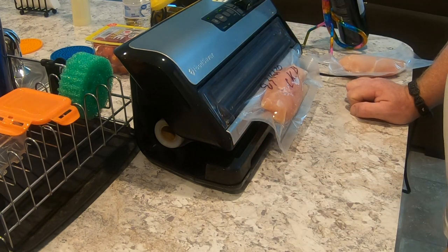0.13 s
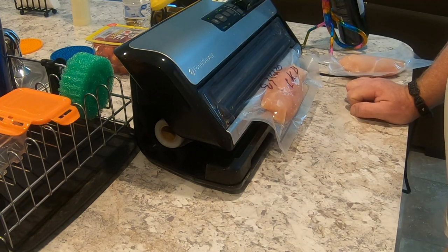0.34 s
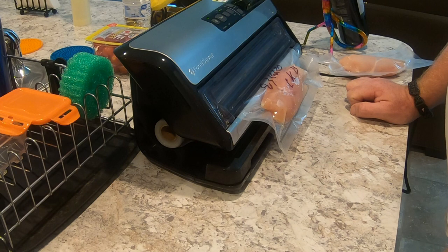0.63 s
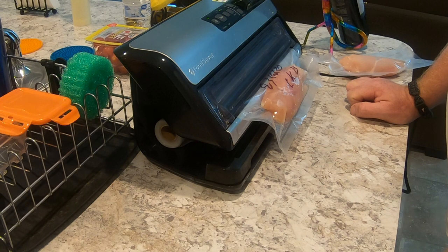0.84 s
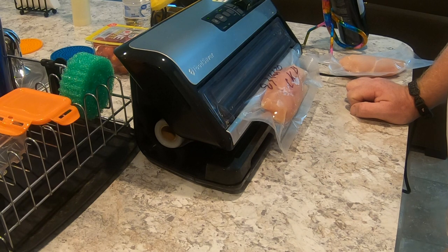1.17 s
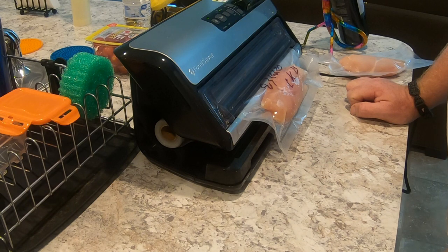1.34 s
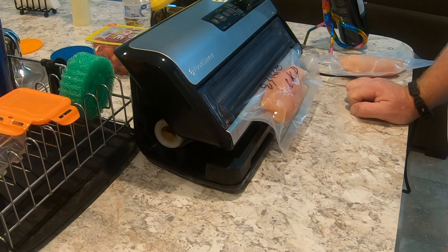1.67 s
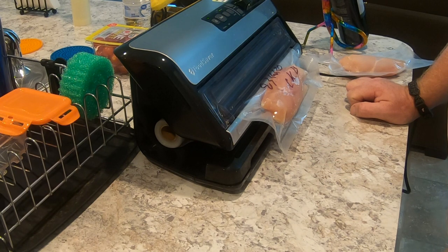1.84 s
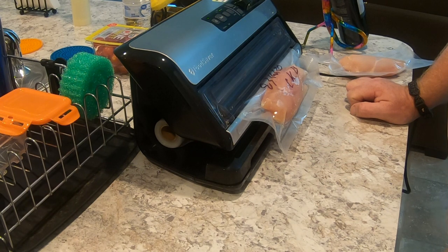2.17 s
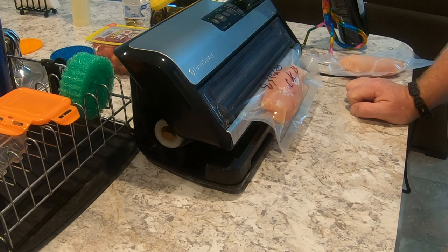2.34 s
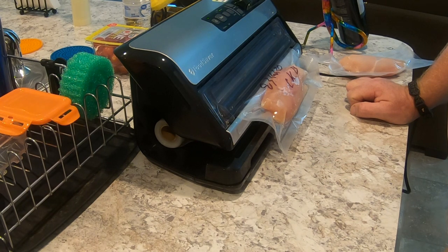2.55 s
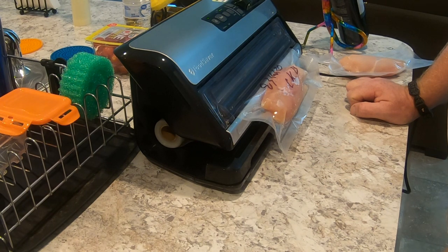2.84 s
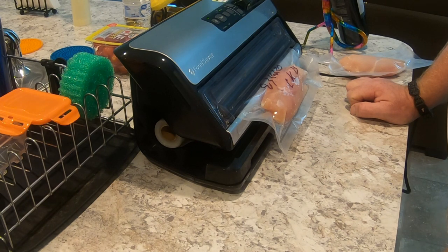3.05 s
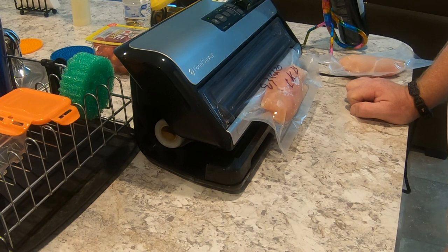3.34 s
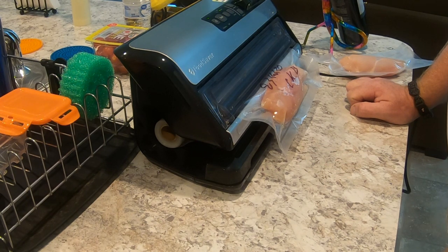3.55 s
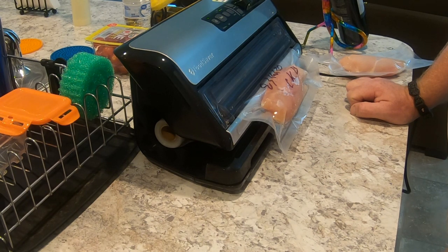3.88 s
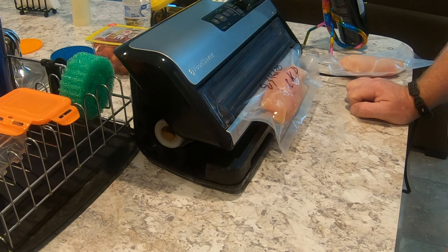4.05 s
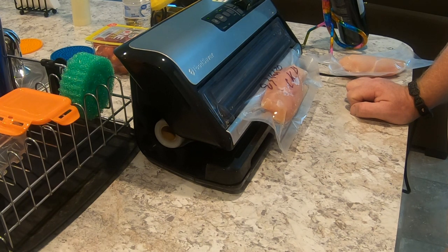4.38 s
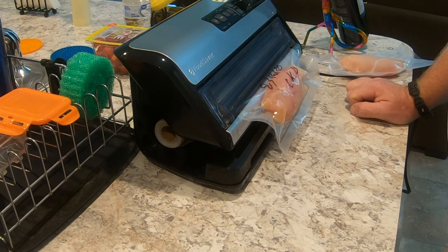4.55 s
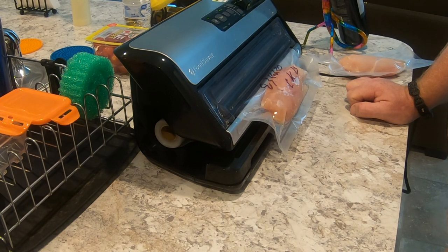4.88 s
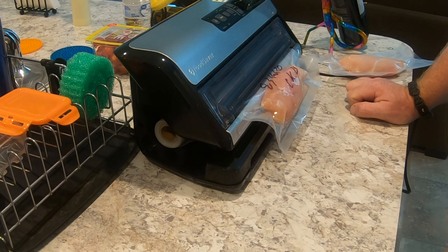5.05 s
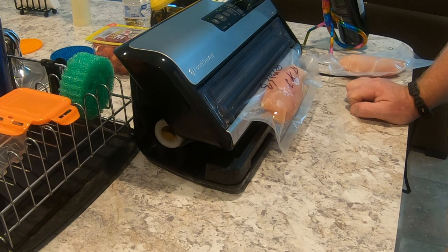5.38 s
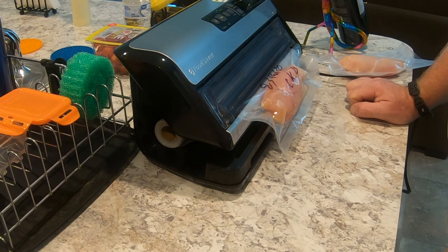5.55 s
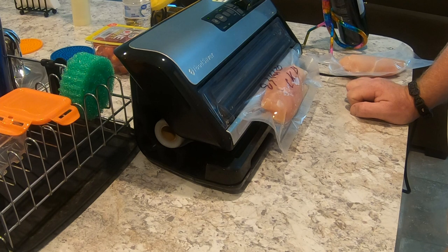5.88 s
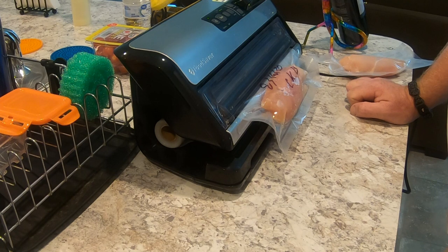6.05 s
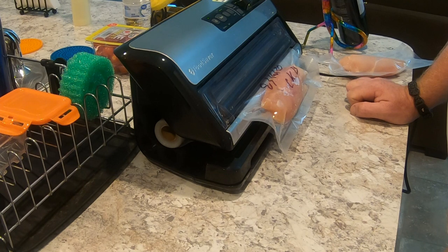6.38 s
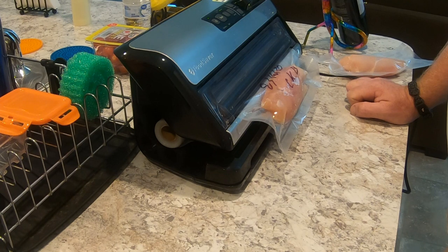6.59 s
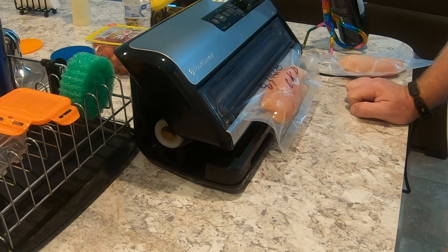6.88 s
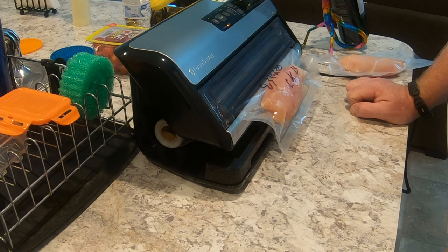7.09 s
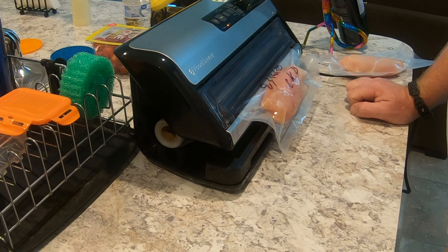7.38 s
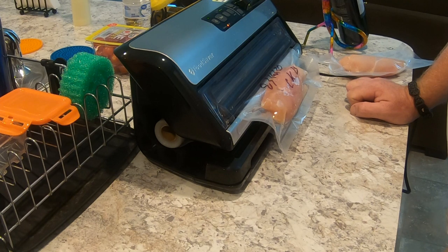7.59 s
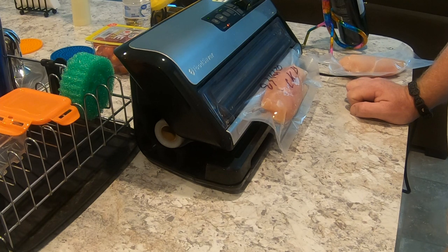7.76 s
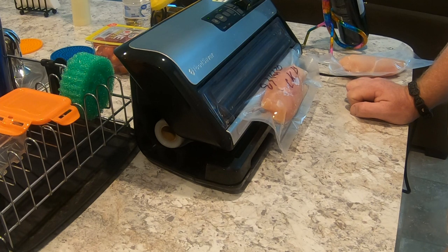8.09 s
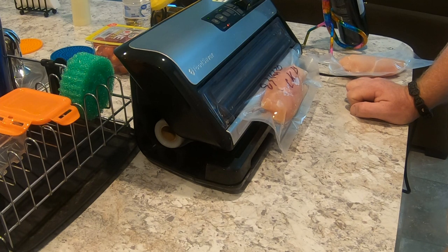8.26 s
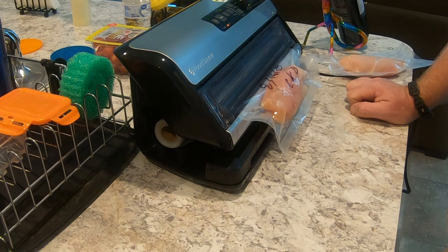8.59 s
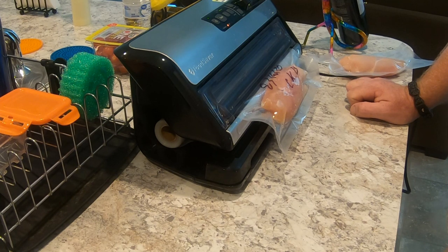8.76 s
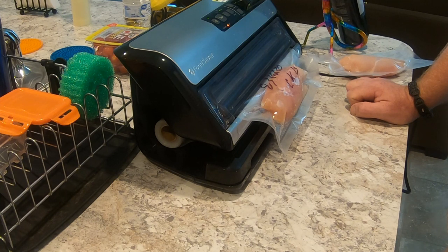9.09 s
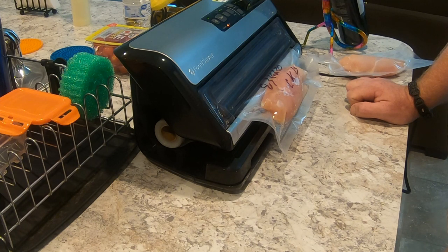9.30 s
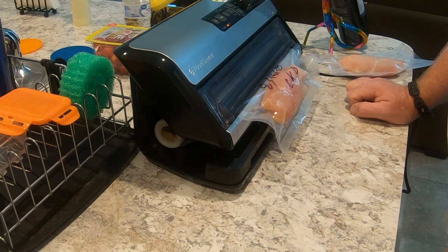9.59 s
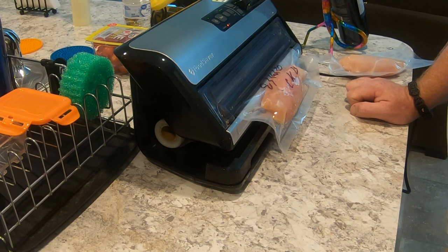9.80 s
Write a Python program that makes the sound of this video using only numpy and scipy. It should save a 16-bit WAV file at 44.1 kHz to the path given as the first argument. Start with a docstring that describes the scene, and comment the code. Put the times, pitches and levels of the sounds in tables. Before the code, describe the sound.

From 0 s a small vacuum pump is already running close to the microphone, slightly right, on a stone counter in a reflective kitchen. Its strong low hum sits near 100 Hz, rising barely a hertz or so over the first seconds, with buzzing overtones that beat quickly, loose panel rattle, and grainy contact noise and hissing valve air pulsing at stroke rate. At about 3.7-3.9 s the housing seats: the panel buzz disappears and the tone becomes cleaner and steadier, with slightly more air. At 7.2 s power cuts. Overtones vanish almost at once, the pitch sags, and two or three soft low shudders fade by about 7.45 s while the room and a counter resonance ring out. Until about 10 s only a quiet low appliance drone, hums, faint thin whines and tiny high ticks, about six a second, remain, creeping up slightly in level.

```python
"""A small motor-driven vacuum pump in a plastic housing buzzes loosely on a stone kitchen counter.
It speeds up a little as the bag empties, its overtones beating with the supply ripple over rattle and valve air.
Near 3.8 s the housing seats and the buzz gets cleaner; at 7.2 s power goes off, and the pump coasts and shudders.
The room rings out, and the gain creeps up in the quiet.
An appliance drone, hums, thin whines and a faint fast ticking run underneath from start to end."""
import sys
import numpy as np
from scipy import signal
from scipy.fft import rfft, irfft, next_fast_len
from scipy.io import wavfile
from scipy.ndimage import uniform_filter1d

SR = 44100
rng = np.random.default_rng(int(sys.argv[2]) if len(sys.argv) > 2 else 0)


def voltage_ratio(decibels):
    """Convert decibels (scalar or array-like) to amplitude ratios, 20 dB per decade."""
    exponent = np.asarray(decibels, float) / 20
    return 10 ** exponent


def transcribe(u):
    """Save the signal u as a 16-bit wav file named by the first command-line argument.

    u: samples, shape (n,) or (channels, n), limited to [-1, 1]; the rate is SR.
    q: integer samples, one column per channel.
    """
    v = np.clip(np.atleast_2d(u).T, -1, 1)
    q = np.round(v * 32767).astype(np.int16)
    wavfile.write(sys.argv[1], SR, q)


N = 437899
TIME_S = np.arange(N) / SR
OFF_S = 7.215   # power off
KNOCK_FALL_S = .017   # time after power off at which overtones and ripple are 6 dB down


def at_hz(points, hz):
    """A spectrum read on a log-frequency axis."""
    f, value = np.transpose(points)
    return np.interp(np.log(hz + 1), np.log(f), value)


def peaks(table, hz):
    """Sum of bell-shaped boosts in dB."""
    return sum(db / (1 + (2 * (hz - f) / width) ** 2) for f, width, db in table)


def drift(rate_hz):
    """Slow random wander with spread 1: noise through two equal one-pole low-passes, run at SR / 40."""
    r = np.exp(-80 * np.pi * rate_hz / SR)
    noise = rng.standard_normal(N // 40 + 4002)
    slow = signal.lfilter([1], [1, -2 * r, r * r], noise)[4000:]   # skip the filter's start
    return np.interp(np.arange(N) / 40, np.arange(len(slow)), slow / slow.std())


def resonance(x, hz, width):
    """Two-pole band-pass with gain 1 on top."""
    r = np.exp(-np.pi * width / SR)
    feedback = [1, -2 * r * np.cos(2 * np.pi * hz / SR), r * r]
    return signal.lfilter([(1 - r * r) / 2, 0, (r * r - 1) / 2], feedback, x)


def coloured(pair, db_at, likeness):
    """Two unrelated noises become mid and side of a stereo pair with the given dB per Hz."""
    size = next_fast_len(pair.shape[1])
    hz = np.arange(size // 2 + 1) * SR / size
    mid, side = rfft(pair, size) * voltage_ratio(db_at(hz)) * np.sqrt(SR / 4)
    alike = np.clip(at_hz(likeness, hz), 0, 1)
    both = np.sqrt(1 + alike) * mid + np.sqrt(1 - alike) * side * [[1], [-1]]
    return irfft(both, size)[:, :pair.shape[1]]


def tone(phase, db, pan_db, spread):
    """One partial; the two ears hear it with slightly different level and phase (spread in rad)."""
    skew = spread * rng.choice([-1, 1])
    left = voltage_ratio(pan_db / 2) * np.cos(phase + skew)
    right = voltage_ratio(-pan_db / 2) * np.cos(phase - skew)
    return voltage_ratio(db) * np.sqrt(2) * np.array([left, right])


# the housing stops buzzing loosely and seats: t/s, seated share (0-1)
SEATED_SHARE = [(0, 0.13), (.9, 0), (3.7, 0), (3.9, 0.88), (10, 0.98)]


def seating():
    """How firmly the housing sits, from loose (0) to seated (1)."""
    t, share = np.transpose(SEATED_SHARE)
    return np.interp(TIME_S, t, share)


START_HZ, CLIMB_HZ, CLIMB_S = 99.9, 1.33, 1.0   # the speed climbs toward a settled rate as the bag empties
SEATED_GAIN_HZ, WANDER_HZ = .5, .06
COAST_LOSS_HZ, COAST_S = 34, .14   # speed lost after power off, and its time constant
STROKE_DB, COAST_SWELL_DB = -17, 1   # the stroke swells as the rotor coasts through the resonance of the feet
LAST_STROKE_S, LAST_STROKE_FADE_S = 7.263, 0.004   # the last full stroke
RATTLE_HOLD_S, RATTLE_FALL_DB_PER_S = 0.031, 203   # rattle and air after power off
SHUDDER_S = 0.025   # from the centre of a shudder to 1/e
# the housing shudders on its feet as the rotor stalls: t/s, level/dB
FOOT_SHUDDERS = [(7.305, -28.5), (7.372, -34), (7.44, -54)]


def motor(seated):
    """Speed, and the levels of stroke tone, overtones and rattle, through running and power off."""
    off = np.maximum(TIME_S - OFF_S, 0)
    speed = START_HZ + CLIMB_HZ * (1 - np.exp(-TIME_S / CLIMB_S))
    speed = speed + SEATED_GAIN_HZ * seated + WANDER_HZ * drift(1.6)
    speed = speed - COAST_LOSS_HZ * (1 - np.exp(-off / COAST_S))
    stroking = .5 - .5 * np.tanh((TIME_S - LAST_STROKE_S) / (2 * LAST_STROKE_FADE_S))
    swell_db = COAST_SWELL_DB * np.clip(off / KNOCK_FALL_S, 0, 1)
    shudder = sum(voltage_ratio(db) * np.exp(-((TIME_S - t) / SHUDDER_S) ** 2) for t, db in FOOT_SHUDDERS)
    stroke_db = 20 * np.log10(voltage_ratio(STROKE_DB + swell_db) * stroking + shudder + 1e-9)
    overtone_fade_db = -20 * np.log10(2) * (off / KNOCK_FALL_S) ** 2   # the loss grows as time squared
    rattle_fade_db = -RATTLE_FALL_DB_PER_S * np.maximum(off - RATTLE_HOLD_S, 0)
    return speed, stroke_db, overtone_fade_db, rattle_fade_db


# overtones of the stroke: multiple, loose level/dB, seated level/dB, left minus right level/dB
STROKE_OVERTONES = [(2, -40, -43, 0), (3, -29.5, -29, -0.5), (4, -32, -31, -1), (5, -53, -38, -1),
                    (6, -39, -39, -4), (7, -40, -33, -2), (8, -42, -35, -1), (9, -33, -35, -2),
                    (10, -45, -41, -2), (11, -37, -36, -2), (12, -40, -38, 1), (13, -40, -39, -2),
                    (14, -49, -42, -3), (15, -45, -40, -3), (16, -47, -42, -3), (17, -49, -47, -3),
                    (18, -43, -52, -2)]
# narrow counter-top resonances that the loose overtones slide past: f/Hz, width/Hz, boost level/dB
COUNTER_MODES = [(299.5, 3, -2), (400.5, 4, 6.5), (404.5, 3, -1.5)]
# supply ripple beating with the stroke: multiple, upper tone loose level/dB, upper seated level/dB,
# lower tone loose level/dB, lower seated level/dB
RIPPLE_PAIRS = [(3, -44.5, -45.5, -56.5, -59), (4, -51.5, -52, -56.5, -57), (5, -41, -56.5, -54.5, -48),
                (6, -37.5, -40, -45.5, -47.5), (7, -33.5, -40.5, -49, -57), (8, -34.5, -44, -45.5, -50),
                (9, -52.5, -62.5, -47, -55.5), (10, -61, -47.5, -45, -51), (11, -49, -45, -52, -54),
                (12, -42.5, -46, -43, -41), (13, -43.5, -44, -53, -46), (14, -46, -48, -48, -38.5),
                (15, -48.5, -59, -57, -49), (16, -50, -56, -46.5, -56.5)]
RIPPLE_HZ = 120


def stroke_tones(turn, speed, stroke_db, fade_db, seated):
    """The stroke, its overtones, and tones on either side of them that beat at supply ripple minus stroke rate."""
    out = tone(turn, stroke_db + 0.15 * drift(4.7), -1.0, 0)
    beat = 2 * np.pi * RIPPLE_HZ * TIME_S - turn
    waver = [drift(4.6) for _ in range(4)]   # strokes are never quite alike
    for k, loose_db, seated_db, pan_db in STROKE_OVERTONES:
        high = min(1, (k / 6) ** 2)   # upper partials are less steady and more spread out
        db = loose_db + (seated_db - loose_db) * seated + fade_db + 0.65 * seated * high
        db = db + (1 - seated) * peaks(COUNTER_MODES, k * speed) + 0.3 * high * waver[int(k) % 4]
        # overtones gather loosely into one knock a stroke
        knock = k * (turn + .8) + rng.normal(0, 1.2)
        knock = knock + 0.17 * high * (1 - 0.74 * seated) * waver[int(k + 1) % 4]
        out += tone(knock, db, pan_db, spread=0.28 * high ** 2)
    for k, up_loose, up_seated, down_loose, down_seated in RIPPLE_PAIRS:
        for sign, loose_db, seated_db in (1, up_loose, up_seated), (-1, down_loose, down_seated):
            db = loose_db + (seated_db - loose_db) * seated + fade_db + 1.15 * waver[int(k + sign) % 4]
            phase = k * turn + rng.uniform(0, 2 * np.pi) + sign * beat + 0.23 * waver[int(k + 2) % 4]
            out += tone(phase, db, -1.46, spread=0.14 * min(1, (k / 6) ** 2))
    return out


RING_HZ, RING_WIDTH_HZ, RING_DB = 406.8, 2.4, -6   # level against the tones that drive it


def counter_ring(tones):
    """A narrow counter-top mode, driven by the tones, that rings on after the overtones stop."""
    return voltage_ratio(RING_DB) * resonance(tones, RING_HZ, RING_WIDTH_HZ)


# air and rattle noise of the pump: f/Hz, level/dB per Hz
CLATTER_SPECTRUM = [(30, -74.5), (60, -78), (90, -60.5), (170, -68.5), (300, -65.5), (400, -68),
                    (700, -59.5), (1000, -66), (1350, -65), (1700, -63.5), (3200, -66.5), (4200, -66.5),
                    (4450, -70.5), (6000, -74.5), (9500, -80.5), (10800, -86), (11400, -103), (12000, -99),
                    (14200, -101), (15000, -125)]
# housing resonances in that noise: f/Hz, width/Hz, boost level/dB
HOUSING_MODES = [(1855, 130, 0.5), (2245, 200, 1), (2680, 490, 6), (3526, 250, 3.5), (3890, 750, 3.5),
                 (5120, 630, 4), (8140, 650, 6), (13070, 660, 8.5)]
# loose panel, heard until the housing seats: f/Hz, width/Hz, relative level/dB
PANEL_MODES = [(649, 250, -49), (770, 41, -49), (803, 51, -57), (1275, 71, -46.5)]
# stereo width of the pump noise: f/Hz, left-right likeness (0-1)
PUMP_LIKENESS = [(25, 0.75), (60, 0.95), (150, .98), (330, .98), (630, 0.29), (1380, 0.77), (3030, 0.94),
                 (5500, 0.5), (8500, 0), (14500, 0.1)]
AIR_HZ = 4770   # valve air takes over from the rattle above this
SEATED_AIR_DB = 1.34   # valve air gains a little once the housing seats


def clatter(turn, fade_db, seated):
    """Rattling contacts swell once a stroke, each stroke with its own force; valve air hisses more evenly above."""
    strokes = (turn / (2 * np.pi)).astype(int)
    force_db = uniform_filter1d(rng.normal(0, 1.7, strokes[-1] + 1)[strokes], size=120)
    # sample by sample, random levels make the contacts grainy
    grains = voltage_ratio(2.35 * np.minimum(rng.exponential(1, (2, N)), 4)) * rng.standard_normal((2, N))
    rattle = grains / grains.std() * voltage_ratio(1.6 * np.cos(turn + .8) + force_db + fade_db)
    air_db = .5 * np.cos(turn) + 0.92 * drift(12) + 1.47 * drift(60) + SEATED_AIR_DB * seated + fade_db
    air = rng.standard_normal((2, N)) * voltage_ratio(air_db)

    def body_db(hz):
        return at_hz(CLATTER_SPECTRUM, hz) + peaks(HOUSING_MODES, hz)

    def rattle_spectrum_db(hz):
        return body_db(hz) - 10 * np.log10(1 + (hz / AIR_HZ) ** 4)

    def air_spectrum_db(hz):
        return body_db(hz) - 10 * np.log10(1 + (AIR_HZ / (hz + 1)) ** 4)

    out = coloured(rattle, rattle_spectrum_db, PUMP_LIKENESS)
    out += coloured(air, air_spectrum_db, PUMP_LIKENESS)
    for hz, width, db in PANEL_MODES:
        buzz = resonance(rattle, hz, width) * np.sqrt(SR / np.pi / width)
        panel = np.array([buzz[0] + 0.2 * buzz[1], buzz[0] - 0.51 * buzz[1]])
        out += voltage_ratio(db) * (1 - seated) * panel
    return out


# stereo lean of the pump noise and its echoes: f/Hz, left minus right level/dB
NOISE_BALANCE = [(60, -0.5), (200, -0.8), (370, -0.6), (690, 0.5), (1270, -3.5), (2330, 0), (4290, -0.5),
                 (7890, -3), (14500, 0)]


def balance(noise):
    """Leans each frequency of the noise to one side by level alone."""
    size = next_fast_len(N)
    hz = np.arange(size // 2 + 1) * SR / size
    lean = voltage_ratio(at_hz(NOISE_BALANCE, hz) * [[.5], [-.5]])
    return irfft(rfft(noise, size) * lean, size)[:, :N]


JUDDER_HZ, JUDDER_WIDTH_HZ, JUDDER_DB, JUDDER_FALL_DB_PER_S = 250, 220, -32.5, 50
STALL_S, STALL_FADE_S = 7.385, .008


def judder():
    """Rough low rattle of the housing on its feet: band-passed noise from power off, fading until the stall."""
    rough = rng.standard_normal(N)
    for _ in range(2):
        rough = resonance(rough, JUDDER_HZ, JUDDER_WIDTH_HZ)
    begin = np.clip((TIME_S - OFF_S) / KNOCK_FALL_S, 0, 1)
    end = .5 - .5 * np.tanh((TIME_S - STALL_S) / (2 * STALL_FADE_S))
    level_db = JUDDER_DB - JUDDER_FALL_DB_PER_S * np.maximum(TIME_S - OFF_S, 0)
    return voltage_ratio(level_db) * begin * end * rough / rough.std()


# decay of the room: f/Hz, time to fall 60 dB t/s
ROOM_DECAY = [(60, 0.43), (160, 0.13), (420, 1), (1100, 0.8), (2910, 0.79), (7680, 0.54)]
# reverberant share: f/Hz, level/dB
ROOM_LEVEL = [(100, 1), (300, -7), (1000, 4), (4000, -12.5), (12000, 1)]
# stereo width of the echoes: f/Hz, left-right likeness (0-1)
ECHO_LIKENESS = [(60, 0.97), (330, 0.96), (630, 0.66), (1380, 0.1), (3030, 0.6), (6630, 0.1)]


def kitchen(x):
    """Diffuse echoes: octave bands of noise that die away, each at its own pace."""
    t, echoes = np.arange(SR) / SR, 0
    for hz in 62.5 * 2 ** np.arange(8):
        octave = signal.butter(2, [hz / np.sqrt(2), hz * np.sqrt(2)], "band", fs=SR, output="sos")
        band = signal.sosfilt(octave, rng.standard_normal((2, SR)))
        fall = voltage_ratio(-60 * t / at_hz(ROOM_DECAY, hz)) * np.clip((t - .004) / 0.0054, 0, 1)
        echoes = echoes + band * fall / np.sqrt(np.sum(fall ** 2))
    echoes = coloured(echoes, lambda hz: at_hz(ROOM_LEVEL, hz), ECHO_LIKENESS) * np.sqrt(2 / SR)
    echoes = echoes * np.clip(2 * (1 - t), 0, 1) ** 2   # silent by the end of a second
    earlier = np.concatenate([x[SR // 2:0:-1], x])   # the pump was already running
    return signal.fftconvolve(earlier[None], echoes)[:, SR // 2:SR // 2 + N]


# appliance drone: f/Hz, relative level/dB per Hz
DRONE_SPECTRUM = [(25, -20), (45, -10.5), (62, -25), (120, -28), (150, -6.5), (200, -5), (300, -5.5),
                  (450, -10), (750, -16.5), (1100, -22), (1700, -21.5), (2800, -39.5), (9000, -41.5),
                  (10500, -57), (14000, -70)]
# stereo width of the drone: f/Hz, left-right likeness (0-1)
DRONE_WIDTH = [(60, 0.97), (130, 0.93), (290, 0.93), (630, 0.66), (1380, 0.1), (3030, 0.6), (6630, 0.1),
               (14500, 0.1)]
DRONE_DB = -56.5


def appliance_drone():
    """Coloured noise whose level wanders slowly."""
    drone = coloured(rng.standard_normal((2, N)), lambda hz: at_hz(DRONE_SPECTRUM, hz), DRONE_WIDTH)
    return voltage_ratio(DRONE_DB + 1.0 * drift(3)) * drone / drone.std()


# appliance hums and whines: f/Hz, level/dB, rms wander of f/Hz
APPLIANCE_TONES = [(43, -73, 4), (361, -57.5, 1), (721, -70.5, 3), (3550, -94, 10), (5082, -91, 20),
                   (5260, -97, 20), (195, -67, 12), (295, -63, 10), (5910, -100, 10), (7200, -98, 30),
                   (8333, -97, 10), (8930, -93, 15), (8985, -95, 15), (10170, -98, 30)]


def hums_and_whines():
    """Lasting tones that wander a little in pitch and level."""
    out = np.zeros((2, N))
    for hz, db, wander_hz in APPLIANCE_TONES:
        phase = 2 * np.pi * np.cumsum(hz + wander_hz * drift(25)) / SR
        out += tone(phase, db + 3.0 * drift(5), 0, spread=0.34)
    return out


TICK_AT_S, TICK_PERIOD_S = 7.795, .1678   # one tick falls here; the others keep the period before and after it
TICK_DB, TICK_HZ = -77, 7600   # level at the onset


def ticking():
    """Band-passed noise that jumps up once a period and falls 60 dB in a tenth of a second."""
    since = (TIME_S - TICK_AT_S) % TICK_PERIOD_S
    tick = rng.standard_normal((2, N))
    for _ in range(2):
        tick = resonance(tick, TICK_HZ, 1800)
    return voltage_ratio(TICK_DB - 60 * since / .1 + 2.9 * drift(3)) * tick / tick.std()


def background():
    """Drone, hums, whines and ticking, together a little to the right."""
    out = appliance_drone() + hums_and_whines() + ticking()
    return out * voltage_ratio(np.array([[-.4], [.4]]))


TONE_ROOM_DB, TONE_ROOM_HZ = -15, 450   # the pump tones reach the room weakly, and only the upper ones


def scene():
    """Pump close by, a little to the right, in the kitchen."""
    seated = seating()
    speed, stroke_db, overtone_fade_db, rattle_fade_db = motor(seated)
    turn = 2 * np.pi * np.cumsum(speed) / SR
    tones = stroke_tones(turn, speed, stroke_db, overtone_fade_db, seated)
    tones = tones + counter_ring(tones)
    noise = clatter(turn, rattle_fade_db, seated)
    noise = balance(noise + kitchen(noise.mean(0)))
    high_pass = signal.butter(4, TONE_ROOM_HZ, "high", fs=SR, output="sos")
    upper = signal.sosfilt(high_pass, tones.mean(0))
    return tones + noise + judder() + voltage_ratio(TONE_ROOM_DB) * kitchen(upper) + background()


def top_cut(x):
    """Nothing passes above the cut-off."""
    return signal.sosfilt(signal.butter(12, 15120, fs=SR, output="sos"), x)


def record(dry, quiet_db=-35, lift_db=5.5, release_s=2.1):
    """Gain control: the gain creeps up once the sound has fallen quiet."""
    level_db = 10 * np.log10(uniform_filter1d(dry.mean(0) ** 2, size=4410) + 1e-12)
    wanted_db = lift_db * np.clip((quiet_db - level_db) / 10, 0, 1)   # full lift 10 dB below quiet_db
    r = np.exp(-1 / (release_s * SR))
    gain_db = signal.lfilter([1 - r], [1, -r], wanted_db)
    return top_cut(dry * voltage_ratio(gain_db))


dry = scene()
out = record(dry)
transcribe(out)
```